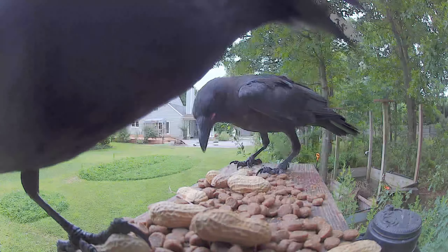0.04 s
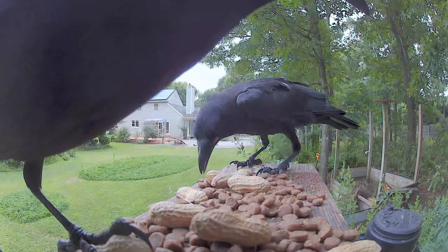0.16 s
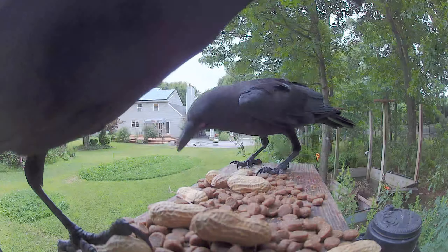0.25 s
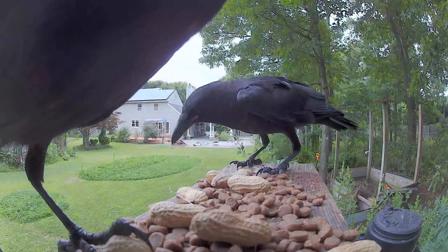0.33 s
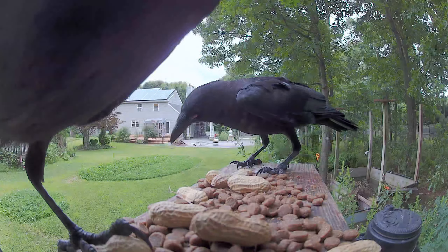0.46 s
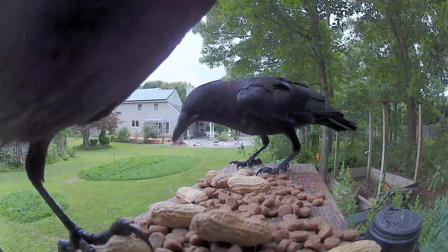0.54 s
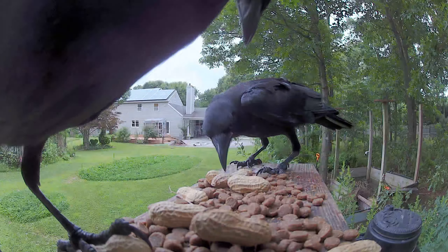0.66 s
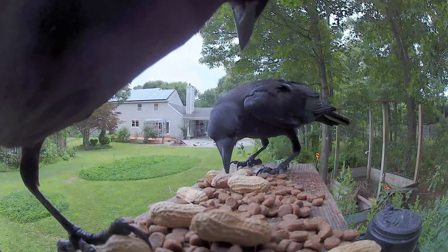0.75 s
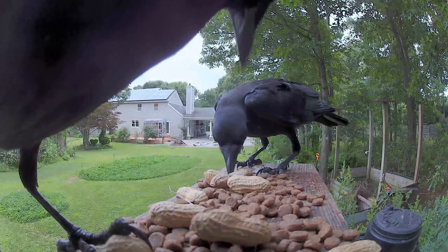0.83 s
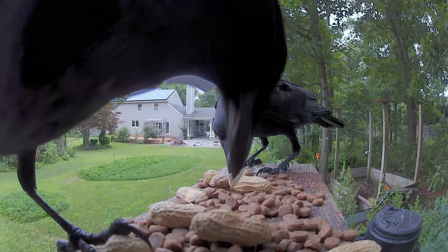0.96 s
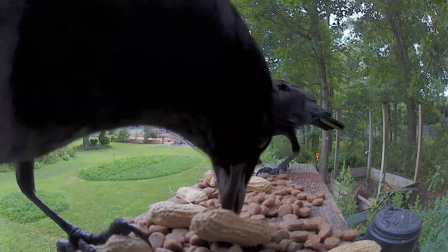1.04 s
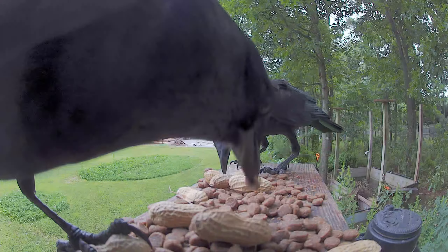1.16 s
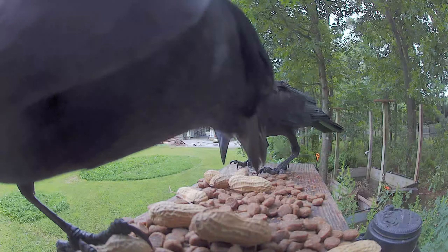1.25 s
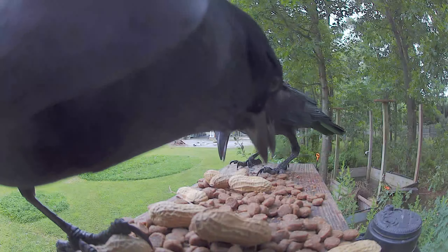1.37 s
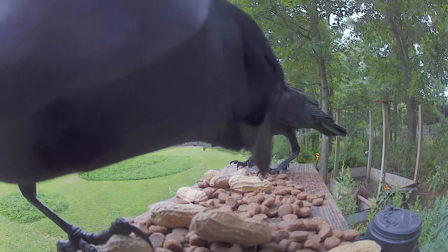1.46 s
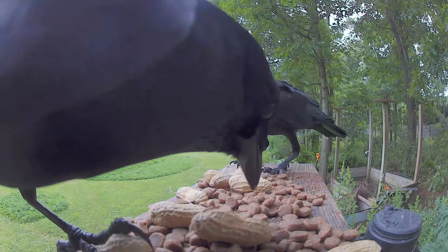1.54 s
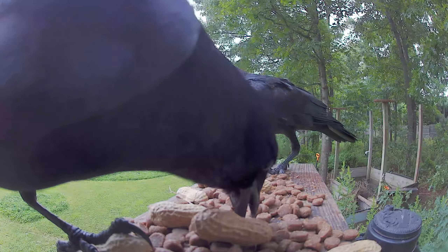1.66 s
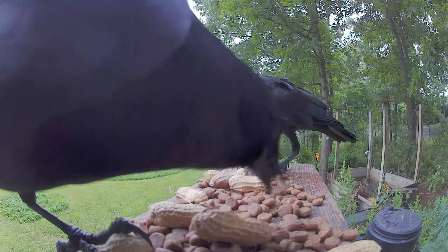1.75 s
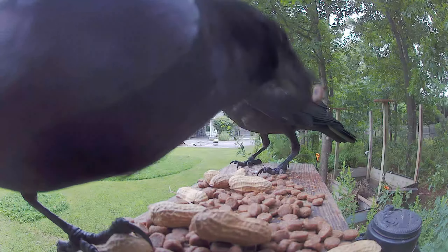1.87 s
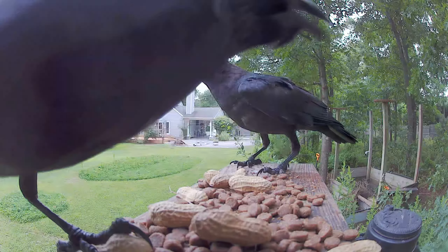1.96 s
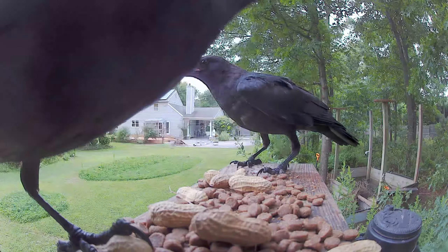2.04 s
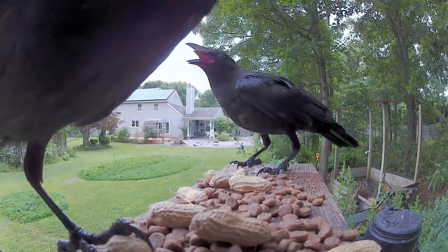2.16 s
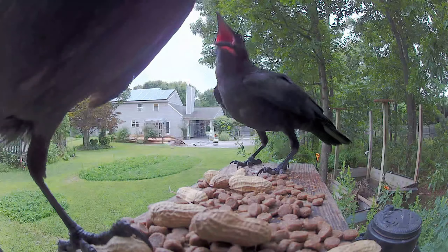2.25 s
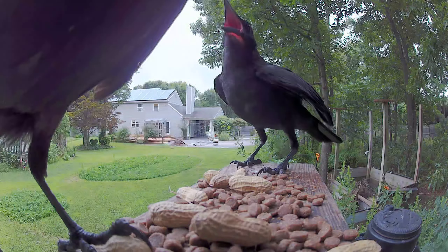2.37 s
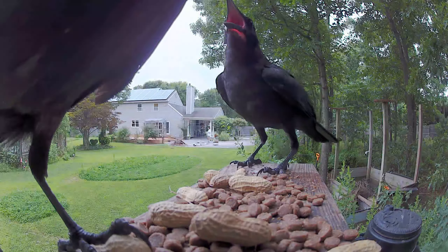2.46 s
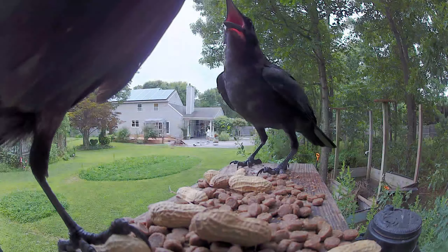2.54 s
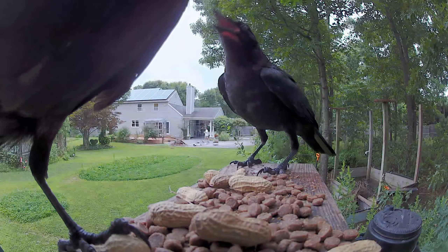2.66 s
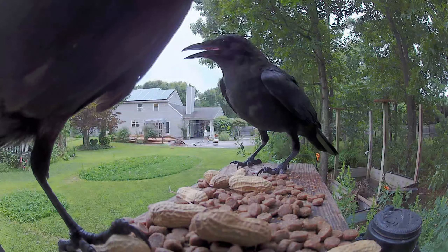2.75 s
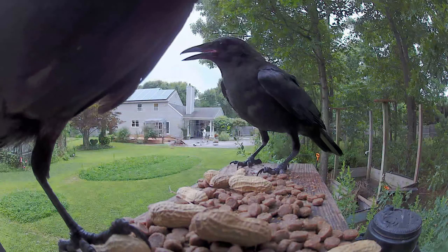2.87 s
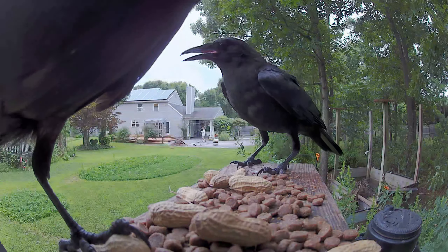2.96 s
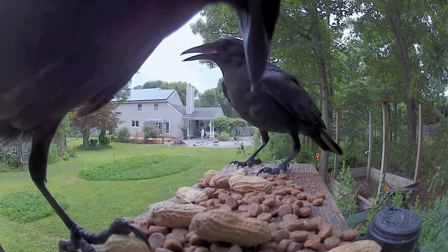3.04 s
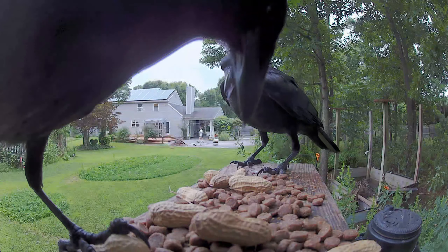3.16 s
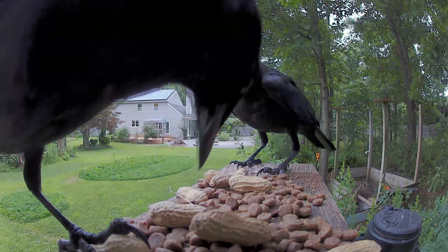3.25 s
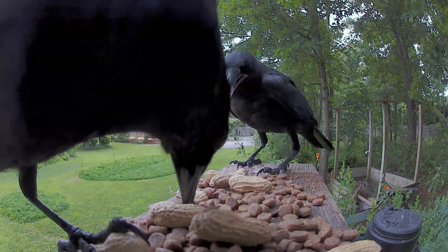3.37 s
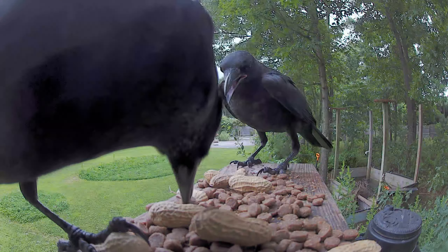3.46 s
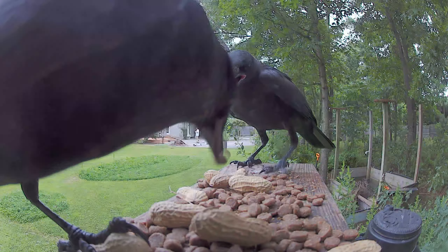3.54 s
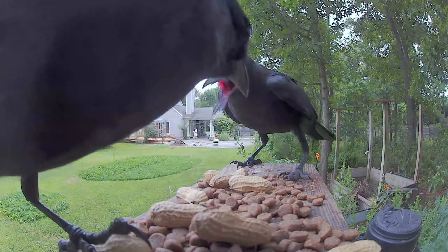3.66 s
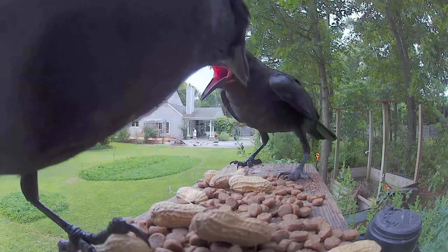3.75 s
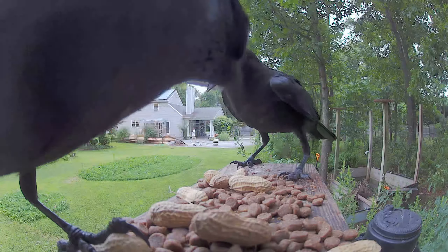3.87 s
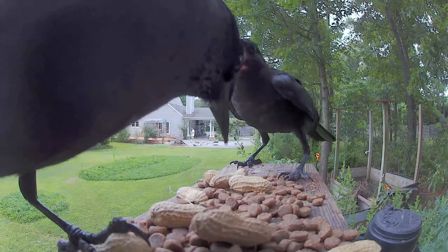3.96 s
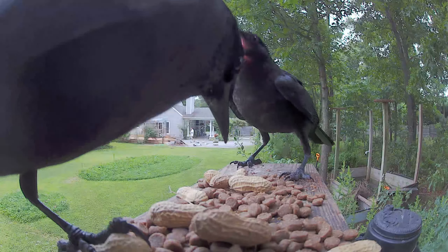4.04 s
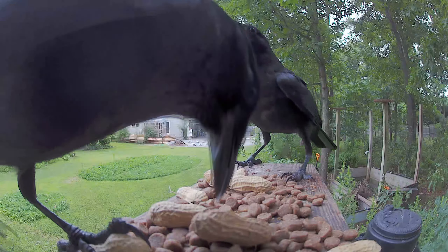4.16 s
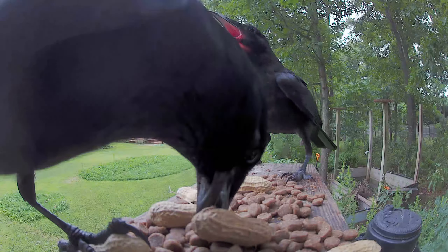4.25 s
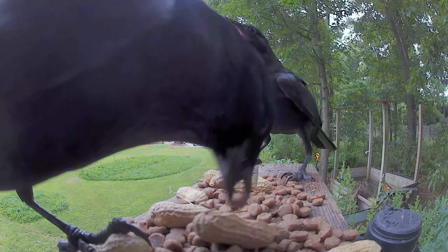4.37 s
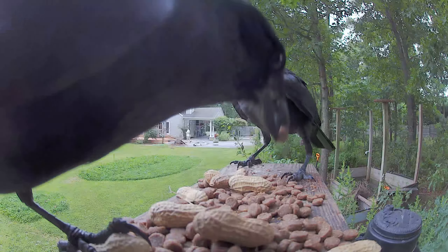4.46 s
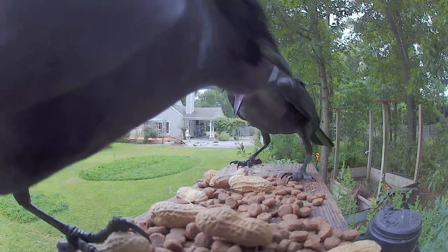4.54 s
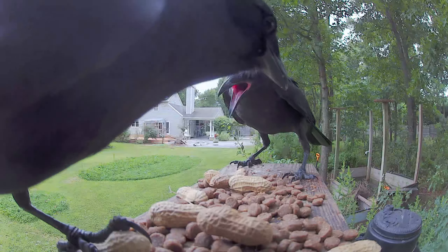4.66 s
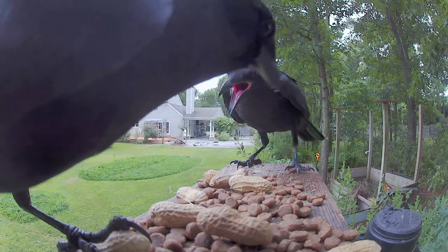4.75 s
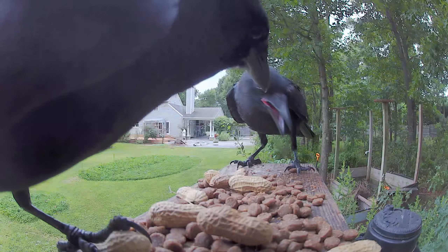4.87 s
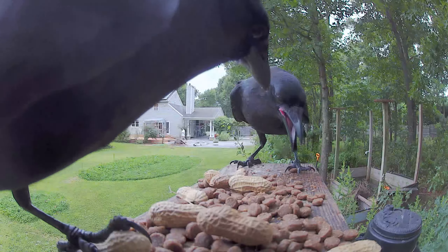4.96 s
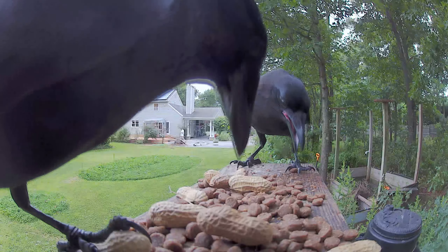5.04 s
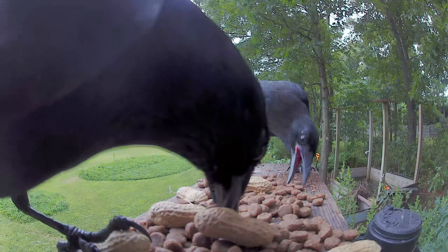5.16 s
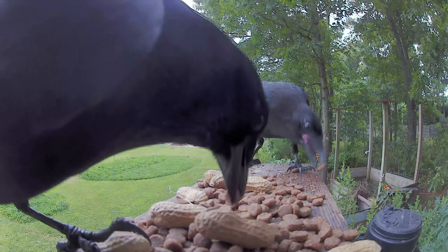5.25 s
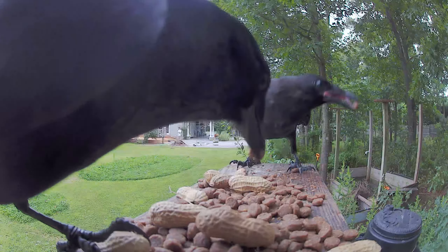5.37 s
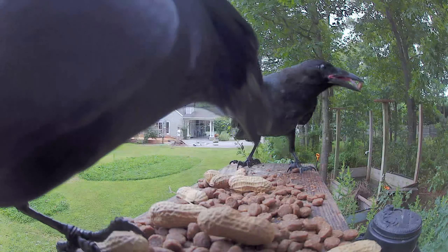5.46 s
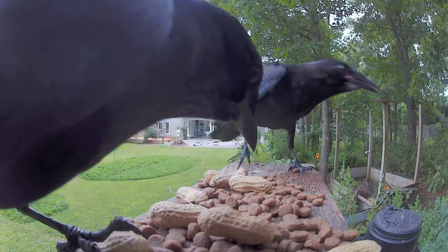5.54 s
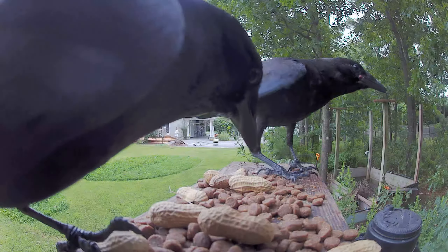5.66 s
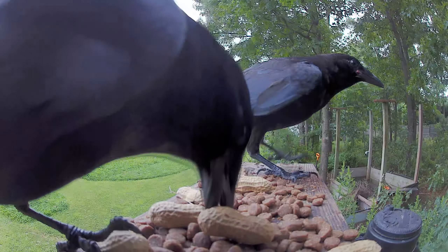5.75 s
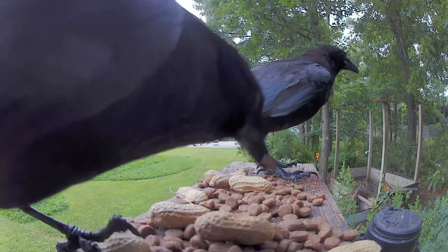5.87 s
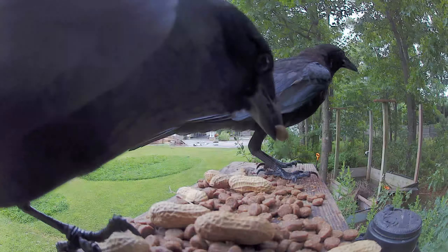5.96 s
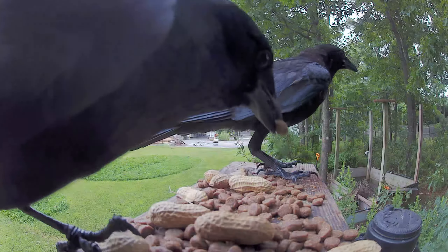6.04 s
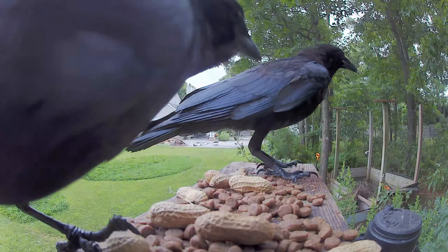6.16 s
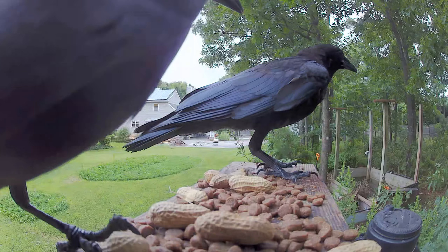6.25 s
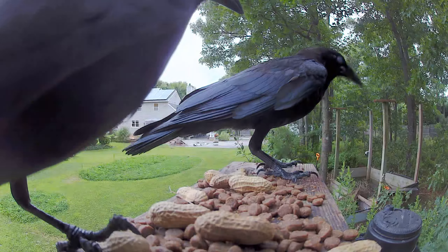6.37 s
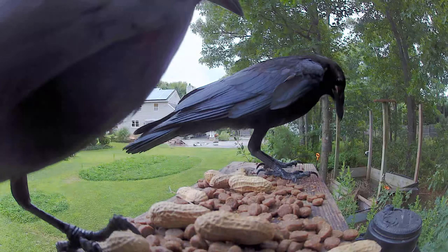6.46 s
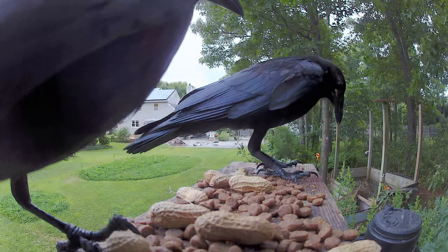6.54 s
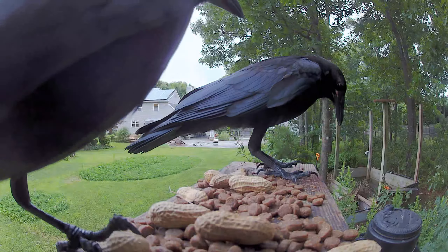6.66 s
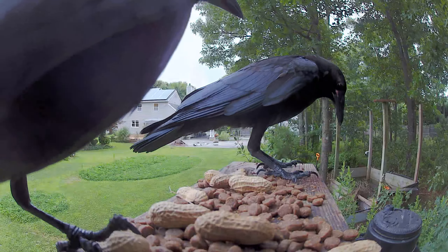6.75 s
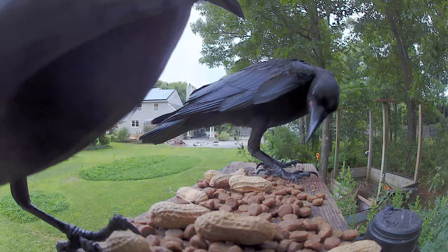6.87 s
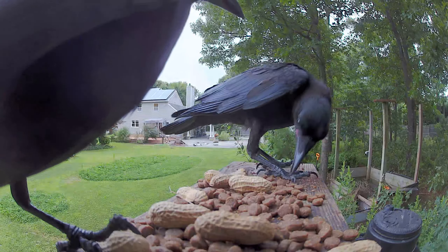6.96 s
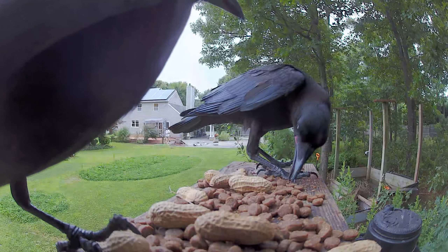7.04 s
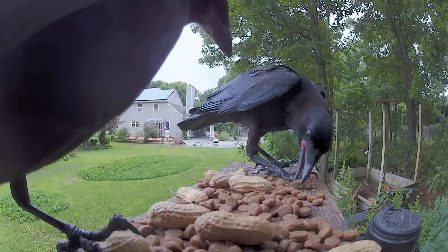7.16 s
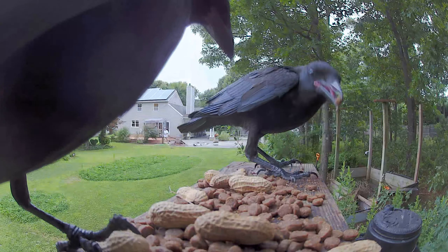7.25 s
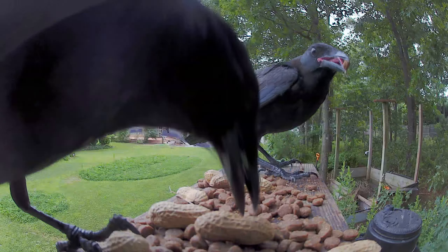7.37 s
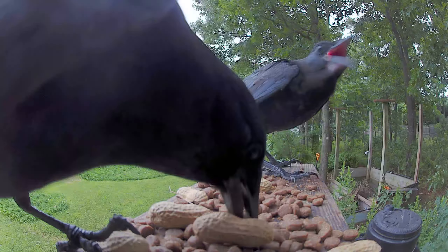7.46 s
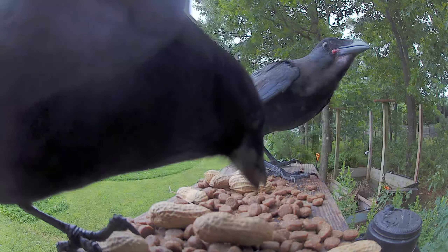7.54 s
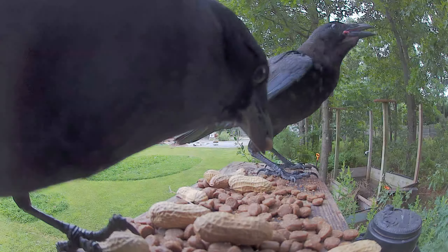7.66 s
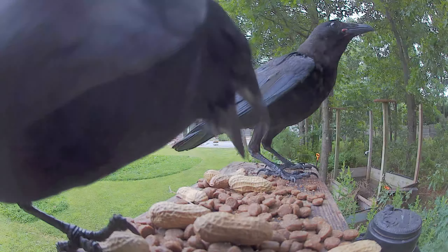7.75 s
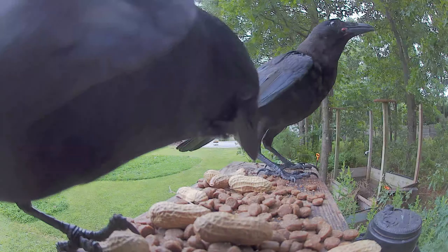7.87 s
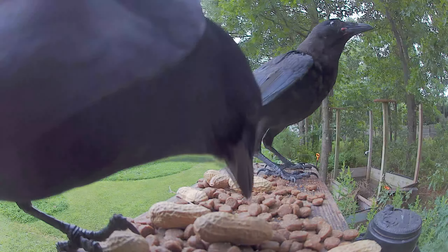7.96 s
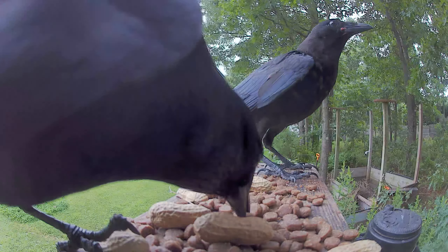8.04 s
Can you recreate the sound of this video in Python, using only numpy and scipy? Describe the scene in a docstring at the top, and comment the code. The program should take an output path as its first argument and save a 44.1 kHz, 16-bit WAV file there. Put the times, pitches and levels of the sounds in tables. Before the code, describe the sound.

A young crow gives harsh, nasal begging calls up close while another crow pecks and cracks peanuts in a quiet garden.

```python
"""A young crow begs in harsh nasal calls on a garden feeding tray, then whines and gives a gulping croak.
Its voice is a train of claps from the syrinx, coloured by throat and beak and cracking into roughness.
Beside it an adult picks at a heap of peanuts: a beak clicks, shells ring and snap, and the tray thuds.
Behind the two lie the soft hush of the garden and a faint wavering insect trill. Close up, in mono."""
import sys
import numpy as np
from scipy import signal
from scipy.fft import rfft, irfft
from scipy.io import wavfile
from scipy.ndimage import map_coordinates

SR = 44100
rng = np.random.default_rng(int(sys.argv[2]) if len(sys.argv) > 2 else 0)


def wav_out(sig):
    """Save sig, one row per channel (or a flat mono array), as 16-bit PCM at SR to the path in sys.argv[1]."""
    wavfile.write(sys.argv[1], SR, np.round(np.clip(np.atleast_2d(sig).T, -1, 1) * 32767).astype(np.int16))


N = 357651
TIME = np.arange(N) / SR

# The colour of the garden bed. Each row: frequency in Hz, relative level in dB.
HUSH_SPECTRUM = [(24, -68.5), (40, -36.5), (84, -28.5), (99, -11), (118, -1), (261, -4.5), (286, -4),
                 (320, -6), (492, -7), (576, -7), (1010, -11), (3280, -26.5), (4210, -26.5), (7080, -34.5),
                 (8870, -51.5), (11500, -76.5), (19500, -120)]

# A foot lands on the tray. Each row: start in seconds, energy in dB.
FOOTFALLS = [(1.853, -35), (4.955, -32), (5.979, -31), (7.706, -24)]
# The beak knocks on a hollow peanut. Each row: start in seconds, energy in dB, crunch length in seconds.
BEAK_KNOCKS = [(1.019, -33, 0.044), (1.061, -39, 0.022), (1.089, -34, 0.033), (1.29, -31, 0.038),
               (1.306, -33, .11), (1.394, -42, .035), (4.956, -33.5, 0.039)]
# A beak clicks sharply or a shell cracks. Each row: start in seconds, energy in dB, ring in Hz,
# crunch length in seconds, snap in dB relative to the body of the hit.
CLICKS_AND_CRACKS = [(0.164, -35, 3030, 0.054, -23), (1.2484, -31.5, 1830, 0.005, -13),
                     (1.294, -30, 1870, .004, -30), (1.853, -37.5, 1250, .05, -11),
                     (2.0756, -20, 3150, .0008, -50), (2.086, -38, 2470, .07, -15),
                     (3.486, -36.5, 3120, .01, -18), (4.439, -39, 1478, .04, -31),
                     (4.947, -37, 3440, 0.039, -6), (5.386, -27.5, 3270, .02, -9.5),
                     (5.4007, -26, 1570, 0.0072, -19.5), (5.964, -35, 1430, 0.035, -12),
                     (5.979, -30, 1300, 0.047, -14), (6.259, -43, 2650, .012, 0),
                     (7.6002, -37, 1600, 0.0021, -24), (7.613, -29.5, 1860, 0.11, -6.5)]
TRAY_HZ, TRAY_WIDTH_HZ = 265, 70

# The steady middle of the caw sags and wobbles. Each row: time in seconds, pitch in Hz.
CAW_SUSTAIN = [(2.49, 333.7), (2.52, 329.6), (2.544, 331.7), (2.578, 324.6), (2.61, 328.8), (2.654, 323.3),
               (2.675, 314.1)]
# The caw's attack and collapse, then the gestures of the other four calls.
# Each row: time in seconds, pitch in Hz, level in dB.
CAW_ATTACK = [(2.408, 409.5, -45), (2.42, 377.6, -32), (2.428, 362.2, -29), (2.48, 337.6, -30)]
CAW_COLLAPSE = [(2.695, 303.3, -35), (2.709, 283.3, -37), (2.725, 224.3, -41), (2.733, 214.3, -46),
                (2.742, 204.1, -62)]
BEG_GESTURE = [(3.772, 291, -39.5), (3.782, 298, -31), (3.8, 314, -27.5), (3.814, 312.6, -28),
               (3.888, 305.5, -26.5), (3.934, 291.5, -27), (3.97, 292.6, -32), (3.982, 281.5, -33),
               (3.991, 283, -30)]
YELP_GESTURE = [(3.986, 280, -31), (4.004, 301.8, -27), (4.03, 320.5, -26.5), (4.08, 338.4, -24),
                (4.13, 317.9, -26), (4.138, 302.0, -30.5), (4.144, 286.4, -32.5), (4.162, 227, -38),
                (4.17, 204.3, -56)]
WHINE_GESTURE = [(7.127, 309, -55), (7.151, 310.0, -41.5), (7.177, 321.7, -42), (7.241, 284.0, -42),
                 (7.291, 259.2, -45.5), (7.369, 249.1, -46), (7.455, 236.4, -46), (7.493, 221.5, -50),
                 (7.527, 201.5, -57), (7.575, 191.7, -76)]
CROAK_GESTURE = [(7.625, 369.2, -58), (7.647, 280.2, -46.5), (7.657, 346.7, -32.5), (7.665, 336.5, -39.5),
                 (7.681, 305.3, -36.5), (7.691, 296.7, -34.5), (7.725, 343.6, -40), (7.775, 359.5, -44),
                 (7.797, 420, -45), (7.817, 368.5, -38.5), (7.831, 350.2, -53), (7.845, 347.1, -64)]
# The colour of throat and open beak in each call. Each row: frequency in Hz, relative gain in dB.
CAW_COLOUR = [(120, -26.5), (310, -11.5), (630, -3), (1500, -0.36), (1700, -8.5), (1900, -0.5),
              (2080, -6.5), (3000, -22), (3700, -19.5), (4600, 0.5), (5400, -3.5), (5750, -25.5),
              (6200, -10.5), (6900, -7), (8800, -40.5)]
BEG_COLOUR = [(120, -37.5), (310, -18), (950, -2.5), (1300, -9.5), (1500, 0), (1700, -8.5), (2000, 3.5),
              (2350, -0.5), (2750, -19), (3700, -49), (5400, -17), (6900, -22), (7400, -32.5), (7900, -58),
              (8800, -55.5)]
YELP_COLOUR = [(120, -42), (310, -20.5), (630, -9), (1300, -6.5), (2000, 0.5), (2350, -6.5), (3000, -47),
               (3300, -33), (4600, -18.5), (5000, -6), (5750, -11.5), (6900, -30), (7400, -29),
               (8800, -55.5)]
WHINE_COLOUR = [(120, -45), (310, -37.5), (630, -24), (1300, -7.5), (1500, 5.5), (3300, -46.5), (4100, -9),
                (4600, -19.5), (5400, -8.5), (5750, -25), (6200, -15.5), (7400, -24), (7900, -49),
                (8800, -43.5)]
CROAK_COLOUR = [(120, -30), (310, -4.5), (630, 4.5), (1500, 3.5), (2350, -22.5), (3000, -30.5),
                (3700, -28.5), (4100, -17), (4600, -16.5), (5400, -31), (5750, -28), (6200, -44),
                (7900, -46), (8800, -75)]
# The voice cracks. Each row: centre in seconds, half length in seconds, added roughness from 0 to 1.
VOICE_BREAKS = [(2.454, .014, .33), (3.781, .017, .62), (3.955, .03, .4), (3.99, .012, .75),
                (7.26, .06, .18), (7.659, .01, .64), (7.692, .025, .52)]
# The beak nearly shuts in mid-call. Each row: centre in seconds, half length in seconds.
BEAK_SHUTS = [(3.977, .016), (7.674, .011)]


def from_db(db):
    return 10 ** (np.asarray(db) / 20)


def rms_one(x):
    return x / np.sqrt(np.mean(x ** 2) + 1e-20)


def energy_one(x):
    return x / np.sqrt(np.sum(x ** 2) + 1e-20)


def add(out, start_s, sound):
    start = round(start_s * SR)
    out[start:start + len(sound)] += sound[:N - start]


def band(x, low_hz, high_hz):
    return signal.sosfilt(signal.butter(2, [low_hz, high_hz], "band", fs=SR, output="sos"), x)


def steep(x, hz, kind):
    return signal.sosfilt(signal.butter(8, hz, kind, fs=SR, output="sos"), x)


def drift(size, rate_hz):
    """A smooth random wobble with an RMS of 1."""
    pole = np.exp(-2 * np.pi * rate_hz / SR)
    return rms_one(signal.lfilter([1], [1, -2 * pole, pole * pole], rng.standard_normal(size + SR))[SR:])


def resonance(x, hz, width_hz):
    """One ringing mode: the narrower, the longer it rings."""
    radius = np.exp(-np.pi * width_hz / SR)
    feedback = [1, -2 * radius * np.cos(2 * np.pi * hz / SR), radius ** 2]
    return signal.lfilter(np.array([1, 0, -1]) * (1 - radius ** 2) / 2, feedback, x)


def coloured(x, spectrum, size=4096):
    """A minimum-phase EQ, so nothing rings ahead of a click."""
    hz, db = np.transpose(spectrum)
    grid_hz = np.maximum(np.arange(size // 2 + 1) * SR / size, 1)
    gain = from_db(np.interp(np.log(grid_hz), np.log(hz), db))
    cepstrum = irfft(np.log(gain))
    cepstrum[1:size // 2] *= 2
    cepstrum[size // 2 + 1:] = 0
    return signal.fftconvolve(x, irfft(np.exp(rfft(cepstrum))))[:len(x)]


def evened(x, size=601):
    """Ride the envelope to 1 over a few cycles, keeping each pulse's shape."""
    window = np.hanning(size)
    power = np.convolve(x ** 2, window / window.sum(), "same")
    return x / np.sqrt(2 * power + 1e-4 * power.mean())


def softened(x, hz):
    """Round each click into a bell-shaped bump."""
    bell = np.exp(-(2 * np.pi * hz * np.arange(-60, 61) / SR) ** 2 / 2)
    return np.convolve(x, bell / bell.sum(), "same")


def garden_hush(level_db=-68):
    """A steady bed of leaves and distance."""
    return from_db(level_db) * rms_one(coloured(rng.standard_normal(N), HUSH_SPECTRUM))


def insect_trill(hz=4300, wander_hz=170, level_db=-88):
    """One thin tone with a fast waver in pitch."""
    cycles = np.cumsum(hz + wander_hz * drift(N, 54)) / SR
    return from_db(level_db) * rms_one(np.sin(2 * np.pi * cycles))


def garden_echo(x, echo_s=.072, echo_db=-35, tail_db=-36, tail_t60=.25):
    """One dull slap, and a thin scatter from trunks and leaves."""
    t = TIME[:SR // 2]
    scatter = energy_one(band(rng.standard_normal(len(t)), 400, 5000) * from_db(-60 * t / tail_t60))
    echo = band(np.interp(TIME - echo_s, TIME, x), 500, 6000)
    return from_db(echo_db) * echo + from_db(tail_db) * signal.fftconvolve(x, scatter)[:N]


def shifting_nuts(per_s=5, spread_db=4):
    """Shells settle under the birds' feet in faint stray ticks."""
    sizes = from_db(-40 + spread_db * np.clip(rng.standard_normal(N), -2, 2))
    ticks = sizes * (rng.random(N) < per_s / SR) + 1e-18
    return band(resonance(ticks, 2020, 900), 1010, 4000)


def footfalls(push_s=.03, size=6000):
    """Soft uneven pushes that set only the tray ringing."""
    out, t = np.zeros(N), TIME[:size]
    for start_s, db in FOOTFALLS:
        force = rng.standard_normal(size) * from_db(-30 * t / push_s)
        add(out, start_s, from_db(db) * energy_one(resonance(force, TRAY_HZ, TRAY_WIDTH_HZ)))
    return out


def pecks(nut_hz=1900, nut_width_hz=99, nut_snap_db=-28, sharp_width_hz=440, snap_hz=6800,
          grains_per_s=2500, grain_spread_db=5, thud_db=-9, full_push_s=.04, size=6000):
    """A first touch and a dying crunch of grains ring the shell or beak, snap, and thud on the tray."""
    out, t = np.zeros(N), TIME[:size]
    knocks = [(s, db, nut_hz, crunch_s, nut_snap_db, nut_width_hz) for s, db, crunch_s in BEAK_KNOCKS]
    sharp_hits = [(*row, sharp_width_hz) for row in CLICKS_AND_CRACKS]
    for start_s, db, hz, crunch_s, snap_db, width_hz in knocks + sharp_hits:
        grains = rng.standard_normal(size) * from_db(grain_spread_db * rng.standard_normal(size))
        grains *= rng.random(size) < grains_per_s / SR
        grains[0] = 3   # the first touch
        force = grains * from_db(-30 * t / crunch_s)
        ring = energy_one(resonance(force, hz, width_hz))
        overtone = from_db(-9) * energy_one(resonance(force, 1.73 * hz, 2 * width_hz))
        crunch = from_db(-10) * energy_one(band(force, 900, 4100))
        body = energy_one(band(ring + overtone + crunch, 840, 3200))
        snap = from_db(snap_db) * energy_one(steep(resonance(force, snap_hz, 1176), 6400, "low"))
        push = min(crunch_s / full_push_s, 1) ** 2   # short pecks barely move the tray
        thud = from_db(thud_db) * push * energy_one(resonance(force, TRAY_HZ, TRAY_WIDTH_HZ))
        add(out, start_s, from_db(db) * (body + snap + thud))
    return out


def roughness(t, hoarse, collapse, collapse_s):
    """A steady hoarseness, the voice breaks, and a rattle as the pressure gives out at the end."""
    breaks = sum(depth * np.exp(-((t - centre) / half) ** 2) for centre, half, depth in VOICE_BREAKS)
    rattle = collapse * np.exp(-((t[-1] - t) / collapse_s) ** 4)
    return np.clip(hoarse + breaks + rattle, .02, 1)


def claps(cycles, strength, rough, jitter_s, shimmer_db):
    """One click at each whole cycle; roughness shakes its timing and strength."""
    index = np.arange(len(cycles))
    at = np.interp(np.arange(np.ceil(cycles[0]), cycles[-1]), cycles, index)
    timing_shake, size_shake = rng.standard_normal((len(at), 2)).T * np.interp(at, index, rough)
    sizes = np.interp(at, index, strength) * from_db(shimmer_db * size_shake)
    offset = index - (at + timing_shake * jitter_s * SR)[:, None]
    return sizes @ (np.sinc(offset) * np.exp(-(offset / 8) ** 2))


def syrinx(cycles, rough, second_share, second_phase, second_hz, jitter_s, shimmer_db, rasp):
    """Two claps a cycle, the second softer, favour the low even harmonics; air hisses after the first."""
    first = claps(cycles, np.ones(len(cycles)), rough, jitter_s, shimmer_db)
    second_strength = np.clip(second_share * (1 - rough / .8), 0, 1)   # gone in a very rough voice
    second = claps(cycles - second_phase, second_strength, rough, jitter_s, shimmer_db)
    air = band(rng.standard_normal(len(cycles)), 2200, 10000) * np.exp(-2 * (cycles % 1))
    return rms_one(first + softened(second, second_hz)) + rasp * rough * rms_one(air)


def throat(x, colour, shift):
    """A shorter throat runs on a faster clock, so all its resonances rise together."""
    clock = np.cumsum(shift) - shift[0]
    positions = np.interp(np.arange(clock[-1]), clock, np.arange(len(x)))
    stretched = map_coordinates(x, [positions], order=3)
    return map_coordinates(coloured(stretched, colour), [clock], order=3)


def call(gesture, colour, hoarse, collapse, collapse_s, waver, treble_db, bite_db, brightening, lurch_db,
         pitch_follow, closing_per_s, gape_per_db=.001, split_hz=3300, upper_share=1,
         shut_sink=.11, hum_db=-12, fade_s=.006, **syrinx_settings):
    """One breath: the syrinx buzzes through a moving throat and beak, shaped in two bands."""
    times, pitches, levels = np.transpose(gesture)
    t = np.arange(times[0], times[-1], 1 / SR)
    hz, level_db = np.interp(t, times, pitches), np.interp(t, times, levels)
    rough = roughness(t, hoarse, collapse, collapse_s)
    cycles = np.cumsum(hz * (1 + waver * drift(len(t), 47))) / SR
    buzz = syrinx(cycles, rough, **syrinx_settings)
    # resonances rise with pitch, rise as the beak gapes for loudness, and sink as it closes
    rise = pitch_follow * np.log(hz) + gape_per_db * level_db - closing_per_s * t
    rise -= np.average(rise, weights=from_db(level_db) ** 2)
    shut = sum(np.exp(-((t - centre) / half) ** 2) for centre, half in BEAK_SHUTS)
    shift = np.clip(np.exp(rise - shut_sink * shut), .75, 1.15)
    body = evened(steep(throat(buzz, colour, shift), split_hz, "low"))
    treble = evened(steep(throat(buzz, colour, shift ** upper_share), split_hz, "high"))
    # with the beak nearly shut, the fundamental hums through the throat
    hum = from_db(hum_db) * shut * np.sin(2 * np.pi * cycles)
    # the treble grows with pressure and roughness, and lurches when the voice cracks
    edge_db = treble_db + brightening * (level_db - level_db.max()) + bite_db * rough
    treble *= from_db(edge_db + lurch_db * rough * drift(len(t), 149.85))
    fade = np.clip(np.minimum(t - t[0], t[-1] - t) / fade_s, 0, 1)
    out = np.zeros(N)
    add(out, times[0], fade * np.sqrt(2) * from_db(level_db) * (body + treble + hum))
    return out


def young_crow(sustain_db=-31):
    """A harsh caw, a nasal beg that breaks straight into a yelp, a sinking whine and a gulping croak."""
    sustain = [(s, hz, sustain_db) for s, hz in CAW_SUSTAIN]
    caw = call(np.vstack([CAW_ATTACK, sustain, CAW_COLLAPSE]), CAW_COLOUR,
               hoarse=.02, collapse=.6, collapse_s=.046, waver=.0012,
               treble_db=2, bite_db=3, brightening=.55, lurch_db=6,
               pitch_follow=.03, closing_per_s=-.04,
               second_share=.96, second_phase=.48, second_hz=6600,
               jitter_s=6e-5, shimmer_db=2.5, rasp=.55)
    beg = call(BEG_GESTURE, BEG_COLOUR, hoarse=.089, collapse=.03, collapse_s=.05, waver=.001,
               treble_db=-10, bite_db=9, brightening=.15, lurch_db=4,
               pitch_follow=.3, closing_per_s=.2, upper_share=.6,
               second_share=.99, second_phase=.494, second_hz=1262,
               jitter_s=4e-5, shimmer_db=.5, rasp=.5)
    yelp = call(YELP_GESTURE, YELP_COLOUR, hoarse=.0586, collapse=.8, collapse_s=.045, waver=.0013,
                treble_db=-7, bite_db=4, brightening=.2, lurch_db=3,
                pitch_follow=.03, closing_per_s=.55,
                second_share=.99, second_phase=.4696, second_hz=1950,
                jitter_s=5e-5, shimmer_db=2.5, rasp=.5)
    whine = call(WHINE_GESTURE, WHINE_COLOUR, hoarse=.15, collapse=.42, collapse_s=.1, waver=.002,
                 treble_db=-9.5, bite_db=3, brightening=.2, lurch_db=1.5,
                 pitch_follow=.22, closing_per_s=.01, upper_share=.1,
                 second_share=.12, second_phase=.503, second_hz=9000,
                 jitter_s=5e-5, shimmer_db=-1.5, rasp=1)
    croak = call(CROAK_GESTURE, CROAK_COLOUR, hoarse=.13, collapse=.1, collapse_s=.038, waver=.003,
                 treble_db=-34, bite_db=39, brightening=.3, lurch_db=2,
                 pitch_follow=.3, closing_per_s=.3, gape_per_db=.014, split_hz=1900, upper_share=.6,
                 second_share=1, second_phase=.476, second_hz=1030,
                 jitter_s=6e-5, shimmer_db=1, rasp=.95)
    return caw + beg + yelp + whine + croak


def scene():
    """Crow and tray up front with a touch of echo, over the garden bed; both channels alike."""
    # the microphone dulls the top of the tray sounds
    tray = steep(pecks() + footfalls() + shifting_nuts(), 7700, "low")
    birds = young_crow() + tray
    return np.tile(birds + garden_echo(birds) + garden_hush() + insect_trill(), (2, 1))


def record(dry, low_cut_hz=90, high_cut_hz=8900):
    """The small microphone loses the deep bass; the top is cut."""
    thin = signal.sosfilt(signal.butter(4, low_cut_hz, "high", fs=SR, output="sos"), dry)
    return signal.sosfilt(signal.ellip(10, .2, 80, high_cut_hz, fs=SR, output="sos"), thin)


dry = scene()
out = record(dry)
wav_out(out)
```